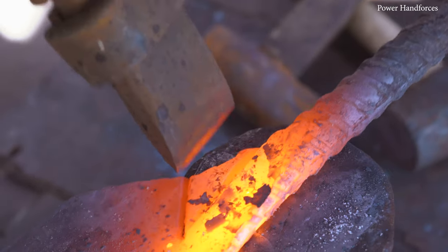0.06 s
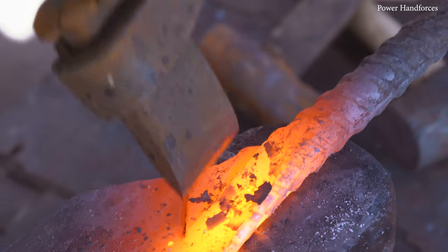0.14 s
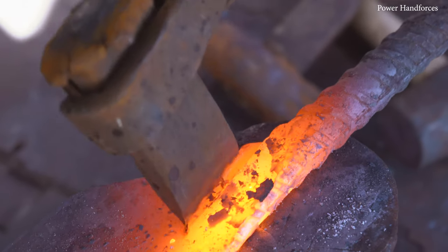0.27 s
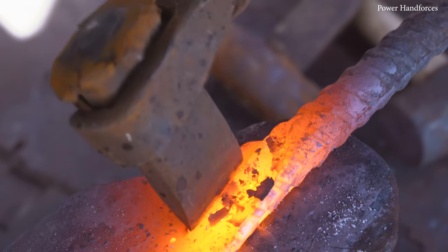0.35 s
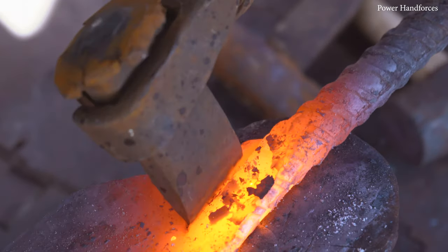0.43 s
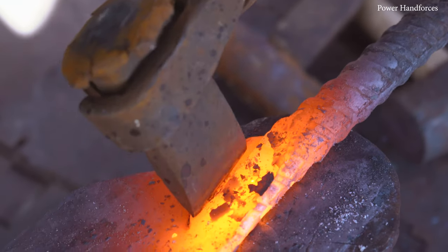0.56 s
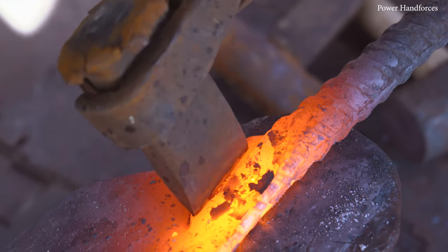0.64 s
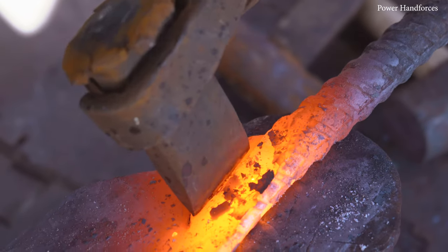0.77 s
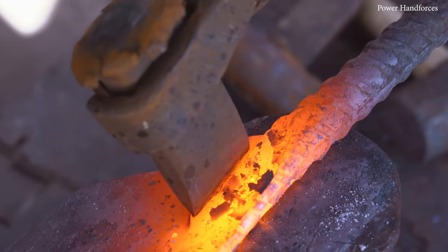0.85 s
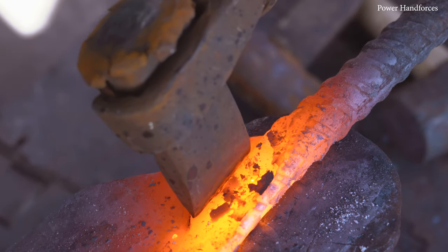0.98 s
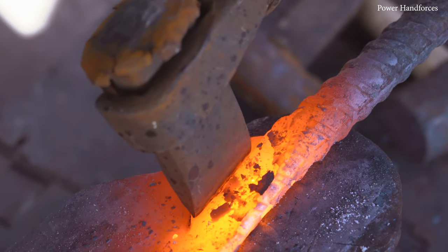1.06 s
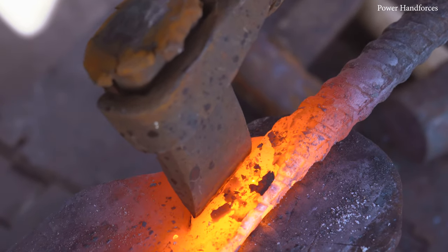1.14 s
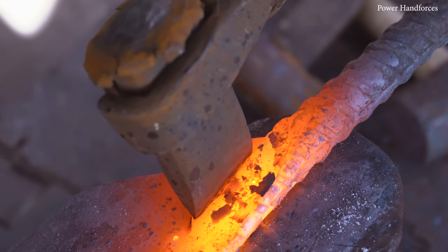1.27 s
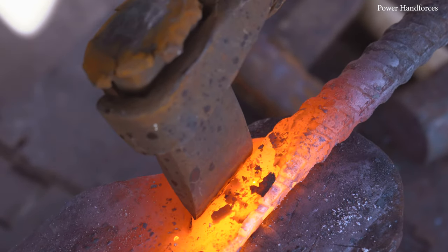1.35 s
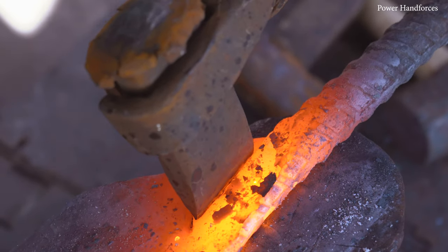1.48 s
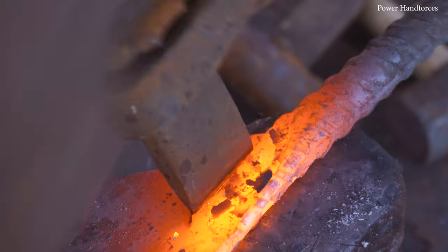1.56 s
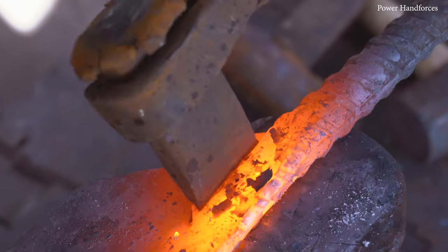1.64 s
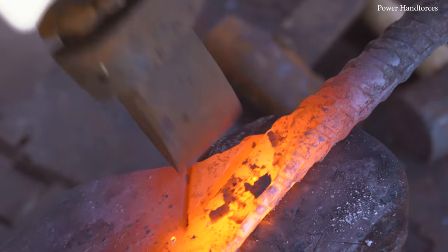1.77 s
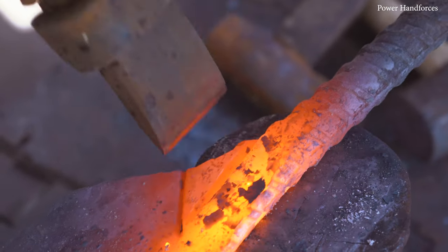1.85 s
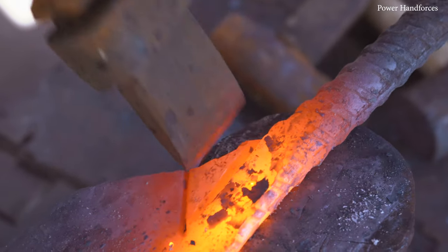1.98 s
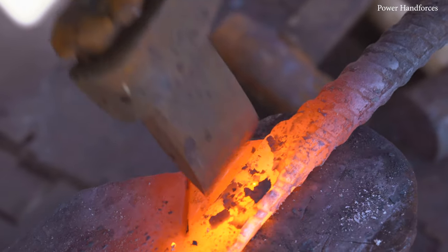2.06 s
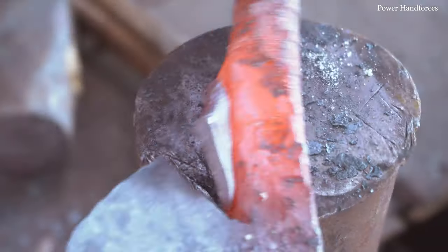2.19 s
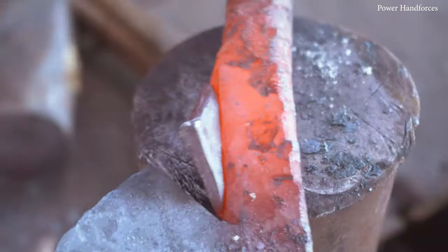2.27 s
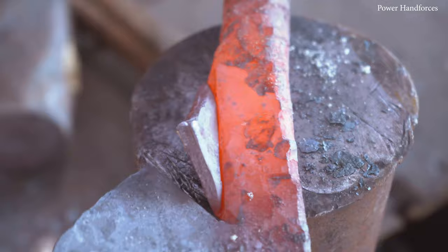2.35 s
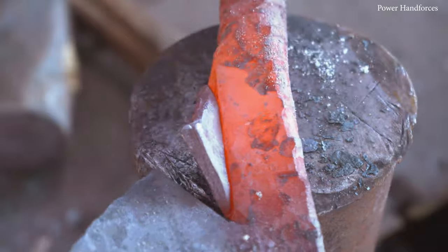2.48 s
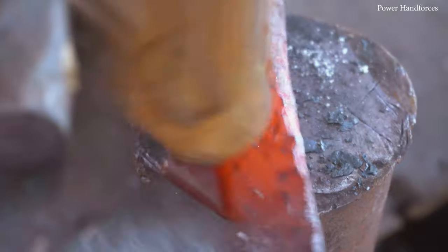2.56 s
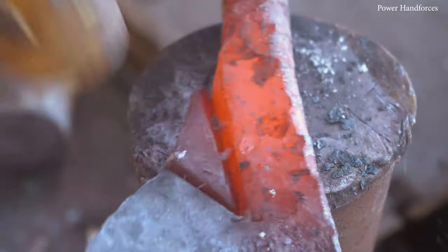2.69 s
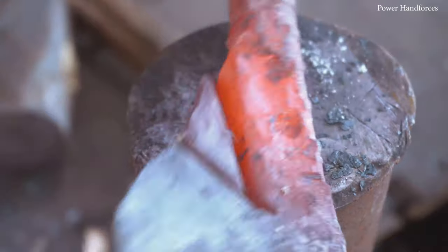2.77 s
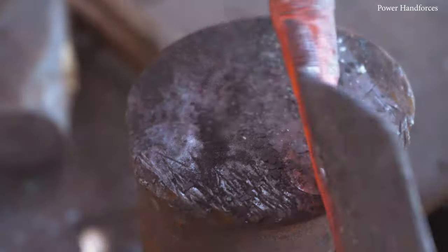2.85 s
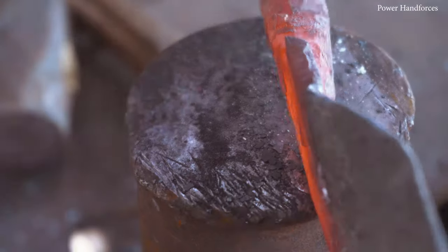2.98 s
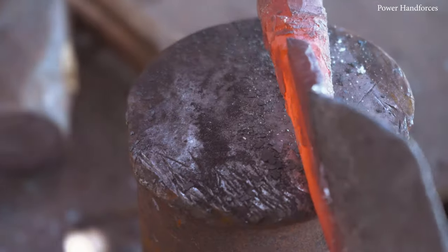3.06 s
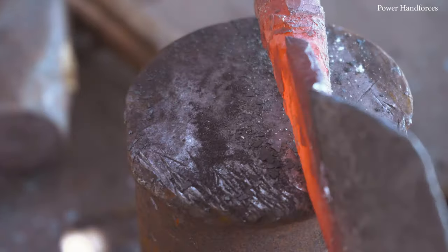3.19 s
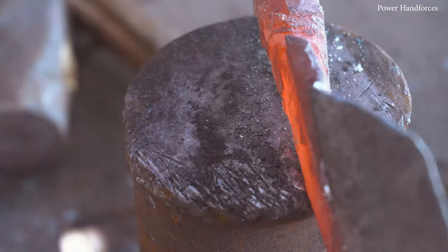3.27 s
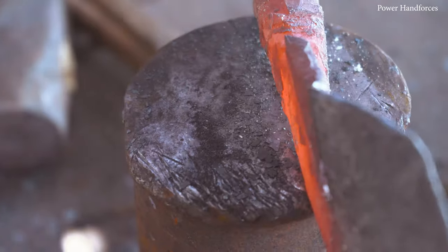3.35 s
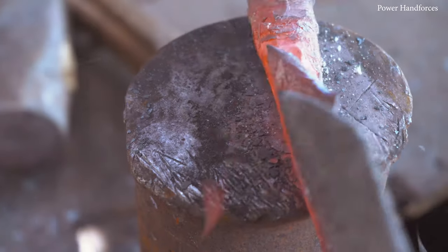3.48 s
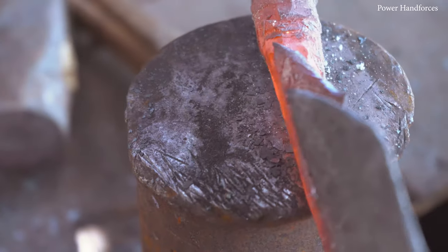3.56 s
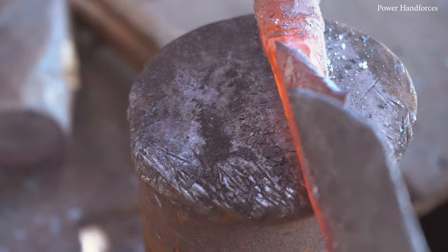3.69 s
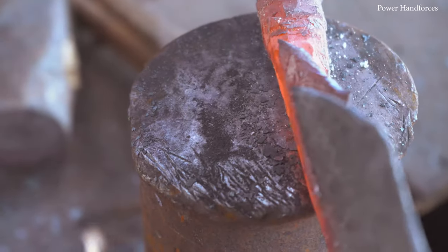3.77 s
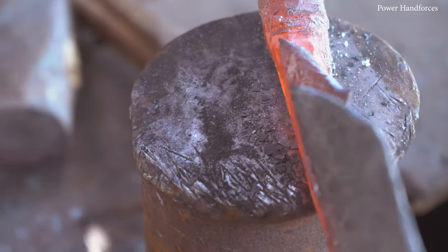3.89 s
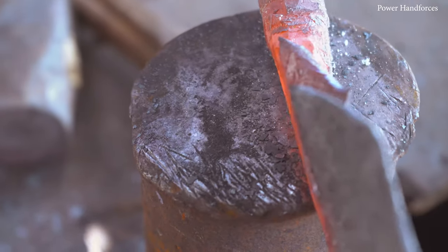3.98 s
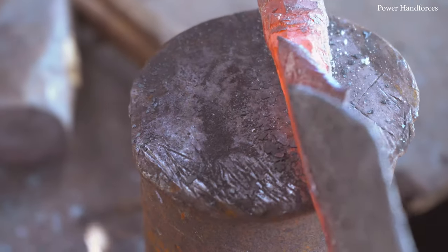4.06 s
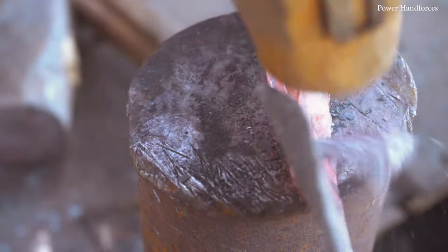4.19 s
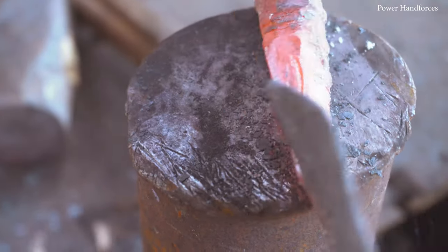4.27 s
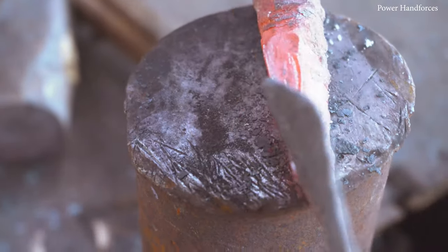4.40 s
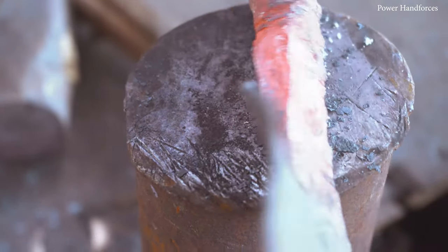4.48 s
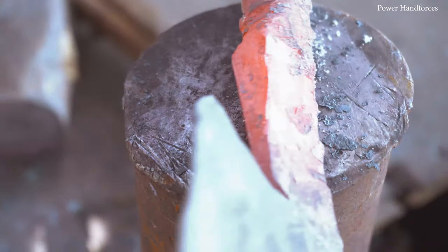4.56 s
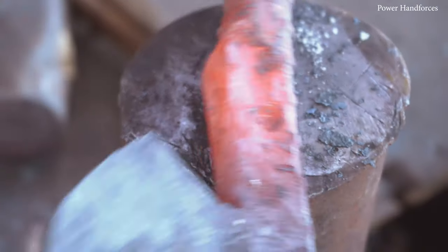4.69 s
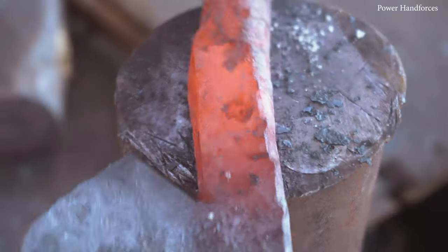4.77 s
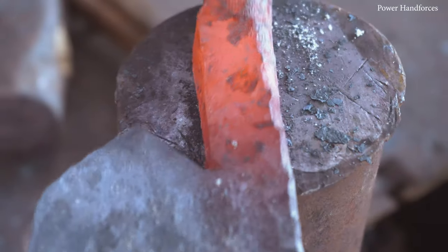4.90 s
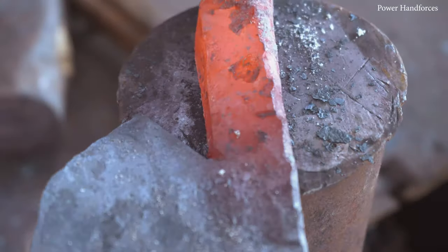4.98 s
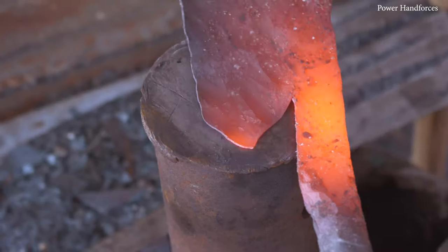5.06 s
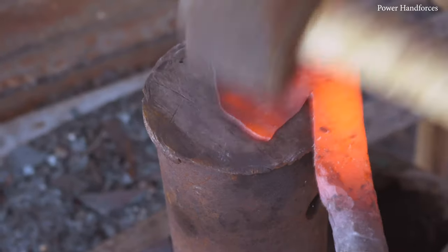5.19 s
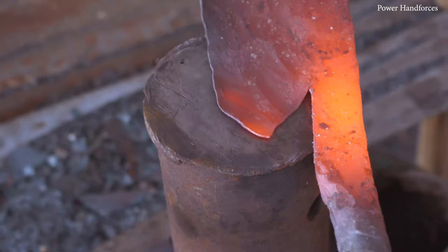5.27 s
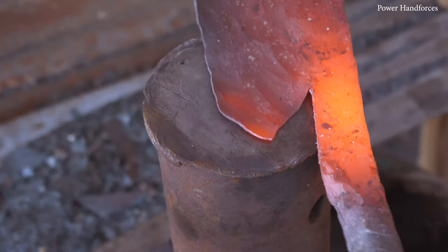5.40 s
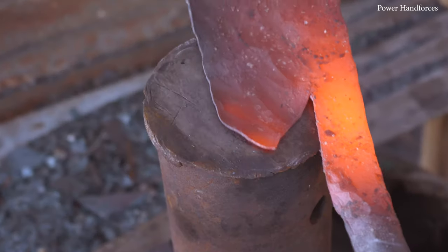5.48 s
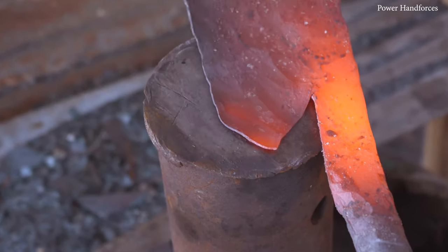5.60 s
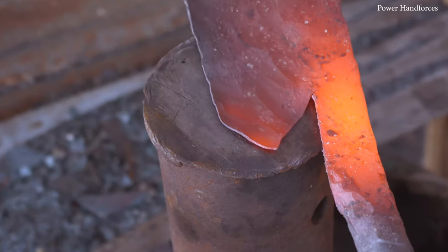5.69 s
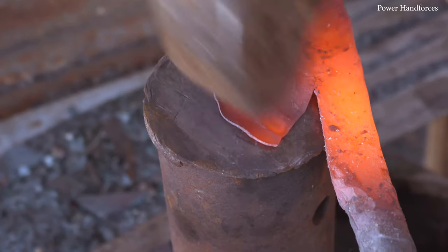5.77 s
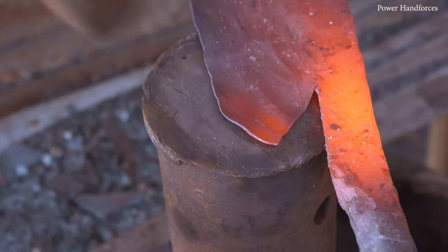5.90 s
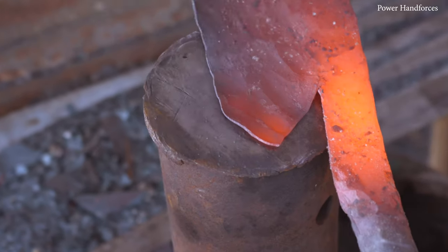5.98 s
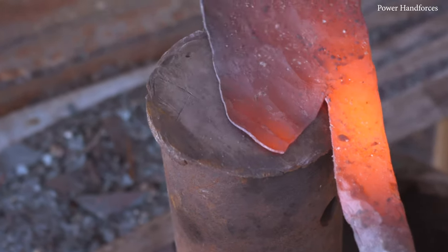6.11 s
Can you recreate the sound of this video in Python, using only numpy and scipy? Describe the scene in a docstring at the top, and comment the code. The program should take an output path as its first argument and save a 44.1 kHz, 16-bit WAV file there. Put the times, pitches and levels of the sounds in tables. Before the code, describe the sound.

Irregular loud metallic hammer blows ring out in a workshop, with light clinks, gritty scrapes and an engine chugging for a while.

```python
"""A smith's hammer forges red-hot steel on a post anvil: seven heavy blows, over three scenes. Each impact
excites the modes of work and anvil and reverberates in a hard-walled workshop. Between blows, tools knock and
scrape on the scale over a steady din; the scene changes twice, and in the middle scene a one-cylinder engine
chugs nearby, its firing pulses filtered by silencer and pipe. A limiter ducks at each blow and recovers while
the room is still ringing."""
import sys
import numpy as np
from scipy import signal
from scipy.fft import rfft, irfft, next_fast_len
from scipy.io import wavfile
from scipy.ndimage import uniform_filter1d, map_coordinates

SR = 44100
rng = np.random.default_rng(int(sys.argv[2]) if len(sys.argv) > 2 else 0)


def transcribe(u):
    """Save the signal u as a 16-bit wav file named by the first command-line argument.

    u: samples, shape (n,) or (channels, n), limited to [-1, 1]; the rate is SR.
    q: integer samples, one column per channel.
    """
    v = np.clip(np.atleast_2d(u).T, -1, 1)
    q = np.round(v * 32767).astype(np.int16)
    wavfile.write(sys.argv[1], SR, q)


N = 270774
TIME = np.arange(N) / SR
ENGINE_ON_S, ENGINE_OFF_S = 2.213, 5.10

# base level of the din in the first and middle scenes: (time [s], level [dB])
FIRST_SCENE_LEVEL = [(0.0, -57.5), (0.266, -62.5), (0.35, -64), (1.62, -58)]
MIDDLE_SCENE_LEVEL = [(2.36, -52), (2.44, -51), (3.25, -48.5), (3.48, -45), (4.6, -47.5), (4.98, -48.5)]
LAST_SCENE_DB = -56.5


def amp(db):
    """Amplitude ratio of a level in decibels."""
    return 10 ** (np.asarray(db) / 20)


def unit(x):
    """Normalisation to rms 1."""
    return x / np.sqrt(np.mean(np.abs(x) ** 2) + 1e-20)


def along(points, hz):
    """Interpolation of (frequency [Hz], value) points on a logarithmic frequency axis."""
    f, values = np.transpose(points)
    return np.interp(np.log(hz + 1), np.log(f + 1), values)


def curve(points):
    """Linear interpolation of (time [s], value) points at every sample."""
    return np.interp(TIME, *np.transpose(points))


def wobble(rate, size=N):
    """Smooth random modulation: a spline through `rate` Gaussian knots a second."""
    knots = rng.standard_normal(int(size * rate / SR) + 4)
    return map_coordinates(knots, [TIME[:size] * rate])


def filtered(x, response):
    """Linear filtering: the spectrum of x times a complex frequency response."""
    n = x.shape[-1]
    padded = 2 * next_fast_len(n // 2 + SR // 8)
    return irfft(rfft(x, padded) * response(np.fft.rfftfreq(padded, 1 / SR)), padded)[..., :n]


def causal(gain):
    """Minimum-phase response with this gain: no output precedes the excitation."""
    cepstrum = irfft(np.log(np.maximum(gain, 1e-6)))
    half = len(cepstrum) // 2
    return np.exp(rfft(np.r_[cepstrum[0], 2 * cepstrum[1:half], np.zeros(half)]))


def resonance(modes, f):
    """Modal superposition of damped resonators: (frequency [Hz], bandwidth [Hz], peak [dB])."""
    return sum(amp(peak_db) / (1 + 2j * (f - hz) / width) for hz, width, peak_db in modes)


def add(track, start_s, sound):
    """Superposition of a sound on the track."""
    part = track[:, round(start_s * SR):][:, :sound.shape[1]]
    part += sound[:, :part.shape[1]]


def diffuse(size):
    """Diffuse-field noise at two points: coherent in the bass, largely incoherent in the treble."""
    # likeness of left and right: (frequency [Hz], coherence [ratio])
    coherence = [(150, .998), (500, 0.94), (1000, 0.7), (2000, 0.26), (4000, 0.048), (10000, 0.23)]
    # left over right: (frequency [Hz], level difference [dB])
    balance = [(60, -2), (130, -0.5), (290, -1), (640, 0), (1410, -2), (3100, 1), (6820, -7), (15000, -6.5)]

    def mid_side_gains(hz):
        angle = np.arccos(np.clip(along(coherence, hz), -1, 1)) / 2
        return np.array([np.cos(angle), np.sin(angle)])

    mid, side = filtered(rng.standard_normal((2, size)), mid_side_gains)
    stereo = np.array([mid + side, mid - side])
    return unit(filtered(stereo, lambda hz: amp(np.outer([.5, -.5], along(balance, hz)))))


def running():
    """Gate with short ramps: 1 while the engine runs, otherwise 0."""
    return np.clip(np.minimum((TIME - ENGINE_ON_S) / 0.0067, (ENGINE_OFF_S - TIME) / 0.018), 0, 1)


def din(level_db, roar_spectrum, roar_db, hiss_db, hiss_swing):
    """Amplitude-modulated noise: one level drives a low roar and, scaled by hiss_swing, a hiss."""
    # airy hiss: (frequency [Hz], spectral density [dB])
    hiss_spectrum = [(1760, -12), (3000, -6), (3730, -12), (4000, 0), (6260, 0), (7940, 0), (12300, -16),
                     (15100, -16), (16000, -32)]
    band = lambda spectrum: unit(filtered(diffuse(N), lambda f: amp(along(spectrum, f))))
    roar = amp(level_db + roar_db + 0.3 * wobble(7.1)) * band(roar_spectrum)
    mean_db = np.mean(level_db)
    swung_db = mean_db + hiss_swing * (level_db - mean_db)
    hiss = amp(swung_db + hiss_db + 1.2 * wobble(19)) * band(hiss_spectrum)
    return roar + hiss


def motor_hum(start_hz=254, sag_hz_per_s=12, level_db=-71):
    """Frequency follows rotation: the wavering tone of a distant motor sinks as it loses speed."""
    hz = start_hz - sag_hz_per_s * TIME + 3 * wobble(9)
    return amp(level_db + 1.6 * wobble(3.8)) * np.sin(2 * np.pi * np.cumsum(hz) / SR)


def workshop():
    """Ambient noise whose level and spectrum change abruptly where the scene changes."""
    # roar with the engine off and on: (frequency [Hz], spectral density [dB])
    calm_roar = [(15, -79), (25, -49), (54, -15), (180, -6.5), (243, -7), (300, -10), (395, -10.5),
                 (543, -7.5), (579, -7.5), (701, -11), (780, -3.5), (831, -6.5), (4000, -10), (5200, -25),
                 (8800, -120)]
    busy_roar = [(100, -17), (220, -11.5), (400, -2.5), (650, -2), (1000, -4), (1700, -1.5), (2600, -3.5),
                 (4000, -8), (5500, -25), (9000, -90)]
    first = din(curve(FIRST_SCENE_LEVEL), calm_roar, roar_db=0.5, hiss_db=0.5, hiss_swing=1.96)
    first += motor_hum()
    middle = din(curve(MIDDLE_SCENE_LEVEL), busy_roar, roar_db=2.5, hiss_db=2, hiss_swing=0.79)
    last = din(LAST_SCENE_DB, calm_roar, roar_db=0.5, hiss_db=-3.5, hiss_swing=1)
    calm = np.where(TIME < ENGINE_OFF_S, first, last)
    return running() * middle + (1 - running()) * calm


def engine(level_db=-56.5, swell_depth_db=7.5, swell_s=0.88, bark_db=2, puff_db=-13, echo_t60=0.045):
    """Source and filter: each firing booms in the silencer, barks from the pipe and puffs out gas."""
    # responses of the silencer and the pipe's mouth: (frequency [Hz], gain [dB])
    silencer = [(25, -42), (75, -21), (105, -16), (127, -4.5), (150, 2.5), (177, 4), (200, -17), (400, -39)]
    pipe_mouth = [(150, -39), (250, -9.5), (310, 3.5), (360, 1.5), (420, -4.5), (505, -0.5), (560, -5),
                  (620, -9), (1000, -16.5), (3000, -47)]
    # engine speed: (time [s], firing rate [Hz])
    speed = [(2.25, 24.5), (2.75, 24.3), (3.42, 29.4), (4.46, 25.1), (5.08, 26.2)]
    through = lambda x, duct: unit(filtered(x, lambda f: causal(amp(along(duct, f)))))
    swell_db = -swell_depth_db * np.exp(-np.maximum(TIME - ENGINE_ON_S, 0) / swell_s)
    cycles = np.cumsum(curve(speed)) / SR
    firings = np.diff(np.floor(cycles), prepend=0) * amp(0.5 * wobble(25.3))
    boom = amp(swell_db) * through(firings, silencer)
    # nearby walls act as an all-pass filter: every firing is smeared alike, so overtones stay clean
    t = np.arange(SR // 10) / SR
    walls = rng.standard_normal(len(t)) * amp(-60 * t / echo_t60)
    echoed = filtered(firings, lambda f: np.exp(1j * np.angle(rfft(walls, 2 * (len(f) - 1)))))
    puff = through(diffuse(N) * np.exp(-2.3 * (cycles % 1)), pipe_mouth)
    bark = amp(bark_db + 0.36 * swell_db) * (through(echoed, pipe_mouth) + amp(puff_db) * puff)
    return running() * amp(level_db) * (boom + bark)


def grit_burst(t60, centre_hz, fall_db_per_octave, grain_db=2.0):
    """Crumbling scale radiates grainy noise; its rise time is proportional to its decay time."""
    # gritty scale: (frequency [Hz], spectral density [dB])
    spectrum = [(150, -21), (500, 1.5), (2000, -0.5), (4500, -6), (7500, -3), (10000, -12), (16000, -16)]
    t = np.arange(SR // 3) / SR
    grains = diffuse(len(t)) * amp(grain_db * wobble(593, size=len(t)))
    fall_db = lambda f: fall_db_per_octave * abs(np.log2((f + 1) / centre_hz))
    grit = unit(filtered(grains, lambda f: amp(along(spectrum, f) - fall_db(f))))
    return grit * (1 - np.exp(-t / (0.02 * t60))) * amp(-60 * t / t60)


def crumbs(per_s=5, relative_db=-3, scatter_db=0.5):
    """Partial masking: loose scale crumbles at random moments, close to the level of the din."""
    calm_db = np.where(TIME < ENGINE_OFF_S, curve(FIRST_SCENE_LEVEL), LAST_SCENE_DB)
    din_db = calm_db + running() * (curve(MIDDLE_SCENE_LEVEL) - calm_db)
    out = np.zeros((2, N))
    for slot_s in np.arange(0, N / SR - 1 / per_s, 1 / per_s):
        start_s = slot_s + rng.random() / per_s
        db = din_db[int(start_s * SR)] + rng.normal(relative_db, scatter_db)
        add(out, start_s, amp(db) * grit_burst(t60=0.3, centre_hz=7200, fall_db_per_octave=9))
    return out


def scrapes():
    """Friction noise: the steel is shifted over the scale on the anvil between blows; two dull, distant knocks
    sound as grainy bursts too."""
    # shifts of the steel, and dull distant knocks at 0.850 s and 0.971 s: (time [s], level [dB], t60 [s],
    # centre [Hz], fall-off [dB/octave])
    shifts = [(.066, -52, 0.13, 8000, 5), (.118, -43, 0.2, 7050, 5.5), (.237, -52, 0.09, 8000, 5),
              (.748, -45, 0.098, 5230, 21), (.850, -48, 0.35, 1930, 4.5), (.971, -50.5, 0.28, 1390, 7),
              (1.083, -50, .17, 6760, 22), (1.963, -39, .13, 7000, 3), (2.056, -45.5, 0.071, 7000, 18),
              (2.884, -33, .06, 4170, 7), (2.922, -33.5, 0.13, 8500, 30), (3.213, -33, .1, 8500, 4),
              (5.10, -52, .7, 5500, 0.5), (5.600, -43.5, .26, 4970, 6), (5.655, -33.5, 0.15, 8000, 7)]
    out = np.zeros((2, N))
    for start_s, db, t60, centre_hz, fall in shifts:
        add(out, start_s, amp(db) * grit_burst(t60, centre_hz, fall))
    return out


def impact(crack_db, t60_factor, build_s=0.0058):
    """Direct and reverberant sound: a short crack, then a room tail that dies sooner in the treble."""
    # reverberation of the workshop: (frequency [Hz], t60 [s])
    room_t60 = [(150, 0.52), (500, 0.46), (1500, 0.44), (5000, 0.4), (9000, 0.35), (15000, 0.28)]
    # colour of the direct sound against the tail: (frequency [Hz], gain [dB])
    crack_colour = [(200, -26), (550, -5.5), (1050, 1), (2200, 5), (3500, 3.5), (5000, 1), (9000, -6.5)]
    t = np.arange(SR) / SR
    hz, frame_s, spectra = signal.stft(diffuse(SR), SR, nperseg=256)
    decay = amp(-60 * frame_s / (t60_factor * along(room_t60, hz)[:, None]))
    tail = signal.istft(spectra * decay, SR, nperseg=256)[1][:, :SR]
    # the face sinks into the soft steel for a few milliseconds
    contact = (1 - np.exp(-t / .0003)) * amp(-60 * t / .024)
    # the direct sound has a part common to both channels
    direct = unit(rng.standard_normal(SR) + diffuse(SR)) * amp(crack_db) * contact
    crack = filtered(direct, lambda f: causal(amp(along(crack_colour, f))))
    return crack + tail * (1 - np.exp(-t / build_s))


def knocks():
    """Light impacts excite the tool's modes as it is set on the work: clinks over a dull clack."""
    # contacts: (time [s], level [dB], crack [dB], room t60 factor [ratio], clink [dB])
    contacts = [(.124, -52, -10, 0.56, 15), (.5135, -34.5, -0.5, 0.35, 0), (0.6071, -34.5, 7, 0.22, 5.5)]
    # the clack: (frequency [Hz], spectral density [dB])
    clack = [(100, -31), (250, -15), (420, -5.5), (700, -13), (1200, -12), (2000, -8.5), (3500, -20.5),
             (6000, -16.5), (9000, -21), (15000, -46)]
    # resonances of the tool: (frequency [Hz], bandwidth [Hz], peak [dB])
    tool_modes = [(480, 70, 1), (795, 25, 8), (1090, 24, 1), (1660, 35, 10.5), (1765, 34, 12),
                  (1900, 40, 9), (2035, 45, 7), (2330, 42, 4)]
    out = np.zeros((2, N))
    for start_s, db, crack_db, t60_factor, clink_db in contacts:
        tool = lambda f: 1 + amp(clink_db) * resonance(tool_modes, f)
        colour = lambda f: unit(causal(amp(along(clack, f))) * tool(f))
        add(out, start_s, amp(db) * filtered(impact(crack_db, t60_factor), colour))
    return out


def hammer(faint_db=-2, faint_width_hz=22, faint_scatter_db=3):
    """Impact excitation: each blow is a broadband clash filtered by the modes of work and anvil."""
    # blows: (time [s], level [dB], crack [dB], thud [dB], clank [dB], sizzle [dB],
    # room t60 factor [ratio], anvil [dB], strike place [half wavelengths at 1 kHz], lie [index])
    blows = [(1.6710, -8.5, 9.5, -3, -2.5, -2.5, 1.03, -12, 0.1, 0),
             (2.7014, -10, 9.5, -5, -6, 3, 0.84, -11, 0.11, 1),
             (2.7620, -25.5, 12, -13, 7.5, 6.5, 0.55, -8, 0.21, 0.5),
             (3.5312, -13.5, 6, 0.5, 1, 3, 0.73, -16.5, 0, 2),
             (4.257, -14, 5.5, -1, -3.5, 4.5, 0.87, -9, 1.3, 2),
             (4.5221, -11.5, 0.5, -9.5, 2.5, -1.5, 0.62, 13, 1.03, 1),
             (5.3152, -7.5, 7.5, -2.5, 2, -5, 0.83, 1, 0, 3),
             (5.9010, -8.5, 9, -2, 4, 1, 0.82, 2, 0.915, 3)]
    # steel on hot steel: (frequency [Hz], spectral density [dB])
    clash = [(30, -20), (100, -35.5), (170, -15.5), (260, -7), (600, -2), (1300, -5), (2000, 0),
             (3500, -2.5), (4800, -0.5), (5300, 1.5), (8000, 1), (10000, -4.5), (12000, -10.5),
             (16000, -16)]
    # modes of the anvil, and of the work as it lies: (frequency [Hz], bandwidth [Hz], peak [dB])
    anvil_modes = [(545, 10.6, 8.5), (631, 23, 2.5), (771, 110, 4.5), (923, 24, 4.5), (990, 610, -7.5),
                   (1110, 19, 0), (1160, 31, -4.5)]
    thick_bar = [(325, 11, 10.5), (607, 52, 5), (5440, 120, -3), (5800, 74, 2), (6960, 30, -2),
                 (8570, 34, 5), (8420, 27, 7), (10000, 54, 16.5)]
    laid_flat = [(2200, 80, 9), (2560, 68, -4), (3220, 90, 8.5), (4730, 190, 1.5), (5290, 150, -5.5),
                 (6250, 32, -21), (8280, 40, 6)]
    on_edge = [(374, 77.4, -1.5), (805, 27, 0), (1900, 220, -6), (2260, 40, -3), (2650, 62, 0),
               (4140, 31, -12), (5160, 82, -17), (6500, 52, 3), (7040, 46, 4), (7660, 32, 8)]
    blade = [(172, 40, 2), (327, 11, 12.5), (1040, 250, 2), (1520, 340, -0.5), (1980, 96, -7),
             (2424, 45, 5), (2520, 74, 4), (4480, 74, 3.5), (5780, 66, 15), (6500, 250, 3.5),
             (10500, 38, 5), (11440, 74, 6), (13160, 100, 14)]
    out = np.zeros((2, N))
    for start_s, db, crack_db, thud_db, clank_db, sizzle_db, t60_factor, anvil_db, place, lie in blows:
        modes = (thick_bar, laid_flat, on_edge, blade)[round(lie)]
        # a bending mode struck near a node stays weak; wavenumber goes with the root of frequency
        shape_db = lambda hz: 20 * np.log10(abs(np.cos(np.pi * place * np.sqrt(hz / 1000))) + .05)
        work = [(hz, width, peak_db + shape_db(hz)) for hz, width, peak_db in modes]
        # a crowd of faint modes of hammer and tongs, excited anew by each contact
        faint_hz = rng.uniform(np.sqrt(900), np.sqrt(14000), size=36) ** 2
        faint = [(hz, faint_width_hz, rng.normal(faint_db, faint_scatter_db)) for hz in faint_hz]
        steel = lambda f: 1 + resonance(work + faint, f) + amp(anvil_db) * resonance(anvil_modes, f)
        # colour from how the face lands: (frequency [Hz], gain [dB])
        landing = [(500, thud_db), (2200, clank_db), (5500, 0), (10000, sizzle_db)]
        colour = lambda f: unit(causal(amp(along(clash, f) + along(landing, f))) * steel(f))
        add(out, start_s, amp(db) * filtered(impact(crack_db, t60_factor), colour))
    return out


def scene():
    """Superposition of the smithing, the engine and the workshop's din."""
    return hammer() + knocks() + scrapes() + crumbs() + engine() + workshop()


def limiter(x, threshold_db=-13, release_db_per_s=170, attack_s=0.0011):
    """Automatic gain control: the gain drops quickly at a loud sound and recovers at a steady rate."""
    pole = np.exp(-1 / (attack_s * SR))
    power = signal.lfilter([1 - pole], [1, -pole], np.mean(x ** 2, axis=0))
    excess_db = np.maximum(10 * np.log10(power + 1e-12) - threshold_db, 0)
    recovery_db = release_db_per_s * TIME
    gain_db = recovery_db - np.maximum.accumulate(excess_db + recovery_db)
    return x * amp(uniform_filter1d(gain_db, size=SR // 600))


def record(dry, ceiling=0.9, low_cut_hz=85, top_hz=16050):
    """Limiting and soft saturation round the peaks; two filters then bound the bandwidth."""
    x = limiter(dry)
    x = x / (1 + (x / ceiling) ** 6) ** (1 / 6)
    x = signal.sosfilt(signal.butter(2, low_cut_hz, "high", fs=SR, output="sos"), x)
    return filtered(x, lambda hz: hz < top_hz)


dry = scene()
out = record(dry)
transcribe(out)
```